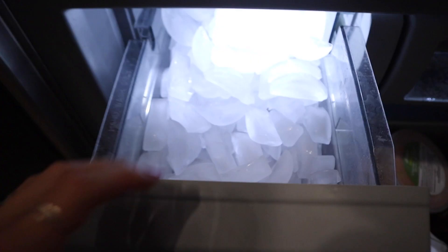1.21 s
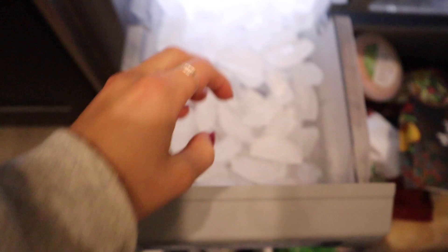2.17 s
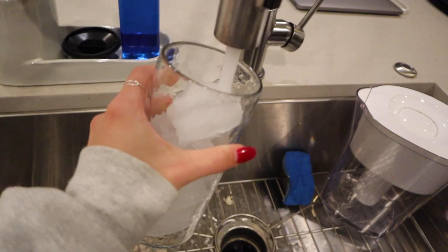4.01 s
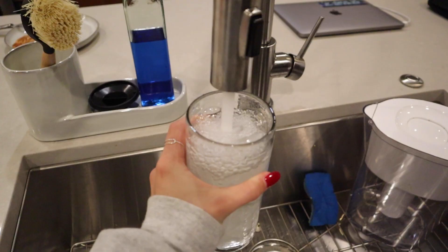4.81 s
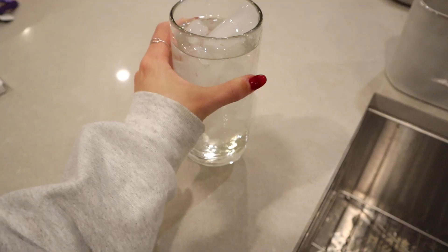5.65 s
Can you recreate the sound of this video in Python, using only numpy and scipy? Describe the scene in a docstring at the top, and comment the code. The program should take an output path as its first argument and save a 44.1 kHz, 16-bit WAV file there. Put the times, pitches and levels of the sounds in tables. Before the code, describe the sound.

In a small kitchen, heard close up, a freezer drawer peels off its seal and rumbles out, thudding as its plastic baskets clack. A hand digs through crunching ice in a plastic bin, and cubes drop into a glass with bright clinks. A tap then fizzes into the glass, filling it until it spills over. A sharp knock and splash sound in the steel sink, the tap stops, and the last water trickles away.

```python
"""Ice water in a small kitchen

Close up, on one microphone. A freezer drawer peels off its seal and rumbles out on its runners, baskets
clacking. A hand digs in the plastic ice bin and drops cubes into a tumbler, which rings at each strike.
An aerated tap fizzes into the glass, whose wall tones sink as the water rises, until it spills over.
Then a knock and a splash in the steel sink; the tap stops and the last water trickles away."""
import sys
import numpy as np
from scipy import signal
from scipy.fft import rfft, irfft, next_fast_len
from scipy.io import wavfile
from scipy.ndimage import uniform_filter1d

SR = 44100
rng = np.random.default_rng(int(sys.argv[2]) if len(sys.argv) > 2 else 0)


def dump_mix(stems):
    """Bounce the given channels to the path in sys.argv[1] as a 16-bit WAV at rate SR."""
    frames = np.atleast_2d(stems).T  # one column per channel
    limited = np.clip(frames, -1, 1)  # hard clip at full scale
    pcm = np.round(limited * 32767).astype(np.int16)
    wavfile.write(sys.argv[1], SR, pcm)


N = 303849
TIME = np.arange(N) / SR
TAP_ON_S, FULL_S, TAP_OFF_S = 4.068, 4.72, 6.23

# The drawer's rumble. Each row: frequency in Hz, relative level in dB.
RUMBLE = [(25, -5.5), (42, -4), (72, 4.5), (150, -11), (215, -3.5), (270, -14), (570, -100)]
# A knock at the sink and its bounce. Each row: start in seconds, level in dB.
SINK_KNOCKS = [(5.9692, -1.5), (5.988, -12)]


def from_db(db):
    """Decibels to gain."""
    return 10 ** (np.asarray(db) / 20)


def rms_one(x):
    """Scale to unit rms."""
    return x / np.sqrt(np.mean(x ** 2) + 1e-20)


def at_hz(points, hz):
    """Read a spectrum's dB on a log-frequency axis."""
    f, db = np.transpose(points)
    return np.interp(np.log(hz), np.log(f), db)


def tilted(hz, pivot_hz, db_per_octave):
    """A harder contact tips the spectrum towards the treble; dB."""
    return db_per_octave * np.log2(np.asarray(hz) / pivot_hz)


def add(out, s, sound):
    """Mix a sound in at s seconds."""
    i = int(s * SR)
    out[i:i + len(sound)] += sound[:N - i]


def between(start, end, fade=0.00052):
    """One while a source sounds, with short ramps."""
    return np.clip(np.minimum(TIME - start, end - TIME) / fade, 0, 1)


def swells(rows):
    """Gain of overlapping gestures: each gains 20 dB per rise time, holds, loses 20 dB per fall time."""
    power = 0
    for s, rise, hold, fall, level_db in rows:
        away = np.maximum(s - TIME, 0) / rise + np.maximum(TIME - s - hold, 0) / fall
        power = power + from_db(level_db - 20 * np.minimum(away, 10)) ** 2
    return np.sqrt(power)


def drift(per_s):
    """A random wander between knots of spread one."""
    knots = rng.standard_normal(N // 100)
    return np.interp(TIME * per_s, np.arange(len(knots)), knots)


def grains(per_s, spread_db):
    """Random clicks of uneven size; rms one."""
    sizes = from_db(spread_db * np.minimum(rng.exponential(1, N), 4)) * rng.choice([-1, 1], N)
    return rms_one(sizes * (rng.random(N) < per_s / SR))


def band(x, low_hz, high_hz):
    """Butterworth band-pass."""
    return signal.sosfilt(signal.butter(2, [low_hz, high_hz], "band", fs=SR, output="sos"), x)


def colour(drive, spectrum):
    """A minimum-phase filter with the given spectrum, falling 7 dB an octave outside it; rms one."""
    size = next_fast_len(N + 8192, True)
    hz = np.maximum(np.fft.rfftfreq(size, 1 / SR), 1)
    octaves_outside = np.abs(np.log2(hz / np.clip(hz, spectrum[0][0], spectrum[-1][0])))
    cepstrum = irfft(np.log(from_db(at_hz(spectrum, hz) - 7 * octaves_outside)), size)
    cepstrum[size // 2:] = 0
    return rms_one(irfft(rfft(drive, size) * np.exp(2 * rfft(cepstrum)), size)[:N])


def noise(spectrum):
    """Smooth coloured noise."""
    return colour(rng.standard_normal(N), spectrum)


def ring(drive, hz, t60):
    """One mode: a unit click starts a dying sine of height one."""
    r, w = from_db(-60 / (t60 * SR)), 2 * np.pi * hz / SR
    return signal.lfilter([0, np.sin(w)], [1, -2 * r * np.cos(w), r * r], drive + 1e-18)


def resonances(drive, rows):
    """A body's steady resonances, each at its own rms level."""
    return sum(from_db(level_db) * rms_one(ring(drive, hz, np.log(1000) / (np.pi * width_hz)))
               for hz, width_hz, level_db in rows)


def sing(drive, hz, width_hz):
    """A resonance whose centre moves; rms one."""
    turn = np.exp(2j * np.pi * np.cumsum(hz) / SR)
    pole = np.exp(-np.pi * width_hz / SR)
    return rms_one((signal.lfilter([1], [1, -pole], drive / turn) * turn).real)


def blow(edges_hz, levels_db, t60, bass_hold, snap, build=0):
    """A click and a dense clatter, one level (over 20 ms) per band; bass_hold lets the lows last longer."""
    t, out = TIME[:SR // 3], 0
    for k, (low, high, level_db) in enumerate(zip(edges_hz, edges_hz[1:], levels_db)):
        life = t60 * (1000 / np.sqrt(low * high)) ** bass_hold
        envelope = from_db(-60 * np.minimum(t / life, 3))
        envelope *= np.minimum((t + 1 / SR) / max(build * life, 1 / SR), 1)
        drive = rng.standard_normal(len(t)) * envelope / np.linalg.norm(envelope)
        drive[0] += snap * (-1) ** k
        zone = band(drive, low, high)
        out = out + zone / np.linalg.norm(zone) * from_db(level_db)
    return out * np.sqrt(.02 * SR)


def kitchen(x, t60, treble_hz):
    """The room's answer at the microphone: a diffuse tail that loses its treble first."""
    t, edges = TIME[:SR // 2], np.geomspace(60, 18000, 9)
    tail = sum(band(rng.standard_normal(len(t)), low, high)
               * from_db(-60 * t / t60 * (1 + low / treble_hz)) for low, high in zip(edges, edges[1:]))
    tail *= np.clip(t / .008, 0, 1) / np.sqrt(SR * t60 / np.log(1e6))
    return signal.fftconvolve(x, tail)[:N]


def room_tone():
    """The kitchen's quiet rumble."""
    # Each row: frequency in Hz, relative level in dB.
    spectrum = [(25, -2.5), (35, -27), (88, -21), (383, -23.5), (749, -35.5), (15000, -50.5)]
    return from_db(-52) * noise(spectrum)


def freezer():
    """The fan blows; the motor hums until the drawer opens."""
    # The fan's air. Each row: frequency in Hz, relative level in dB.
    fan = [(60, 12), (130, 0), (900, -2.5), (3000, -20.5), (9000, -24.5)]
    hum = from_db(-41.5) * np.sqrt(2) * np.sin(2 * np.pi * 490 * TIME)
    return hum * between(-1, 0.14, fade=0.017) + from_db(-45) * noise(fan)


def hollow(x):
    """What shakes the drawer is heard both directly and through its hollow plastic basket."""
    # The basket's resonances. Each row: frequency in Hz, gain in dB.
    modes = [(396, 4), (616, 0), (953, 1.5), (1270, -4), (2030, 1.5), (2480, -6)]
    peaks = sum(from_db(mode_db) * signal.lfilter(*signal.iirpeak(hz, Q=17.3, fs=SR), x + 1e-18)
                for hz, mode_db in modes)
    return from_db(-2) * x + peaks


def drawer():
    """The drawer's speed drives rumble, rollers and rubbing; seal and baskets drag, the runners scrape."""
    # Gestures. Each row: peak time, rise, hold and fall in seconds, level in dB.
    pulls = [(0.78, 0.45, 0.16, 0.65, -28), (1.87, 0.18, 0.22, 0.48, -29.5)]  # the drawer gathers speed, runs and coasts
    rubs = [(0.18, 0.55, 0.14, 0.91, -36.5), (0.52, 0.29, 0.092, 0.52, -34),
            (2.08, 0.077, 0.024, 0.47, -37)]  # seal and baskets drag
    scrapes = [(0.15, 0.021, 0.01, 0.19, -33)]  # the runners stick and slip
    # Spectra of rolling and rubbing. Each row: frequency in Hz, relative level in dB.
    roller_spectrum = [(88, -10), (150, -17.5), (193, 4), (284, 4.5), (618, 2.5), (3000, -24), (6600, -120)]
    rub_spectrum = [(710, -18.5), (1200, 0.5), (3700, 1), (4800, -7), (9610, -11), (16000, -31.5)]
    # The runners' resonances. Each row: frequency and width in Hz, relative level in dB.
    runners = [(2200, 160, 3), (2840, 360, 0.5), (3720, 370, -6), (8400, 400, -10.5)]
    speed = swells(pulls)
    rumble = from_db(-8) * speed * noise(RUMBLE)
    rollers = speed * rms_one(hollow(colour(grains(2500, 0.93), roller_spectrum)))
    rubbing = colour(grains(2500, 2.3) * from_db(2.4 * drift(60)), rub_spectrum)
    scraping = swells(scrapes) * resonances(grains(900, 0.92), runners)
    pressure = np.hypot(swells(rubs), from_db(-20.5) * speed)
    return rumble + rollers + pressure * rubbing + scraping


def drawer_knocks(shudder_t60=0.41):
    """Plastic baskets clack; each thud sets the steel frame ringing and shuddering, deeper when soft."""
    # Each row: start in seconds, thud and clack in dB, brightness in dB per octave, t60 in seconds.
    knocks = [(0.249, -40, -38, 5, 0.13), (0.409, -37.5, -44.5, -7, 0.089), (0.4847, -24, -18, -3.5, 0.018),
              (0.574, -36, -35.5, -2.5, 0.022), (0.708, -38, -19.5, -3.5, 0.11),
              (0.936, -23, -32.5, 2, 0.18), (0.96, -8, -29.5, -9, 0.036), (1.309, -30, -26.5, -2.5, 0.19),
              (1.455, -23.5, -31, -3.5, 0.082), (1.683, -35, -53.5, -4, 0.046),
              (1.924, -42, -27.5, 1, 0.024), (1.965, -35, -32, 0, 0.19), (2.008, -27, -17.5, -3, 0.046),
              (2.017, -29.5, -21, -0.5, 0.056)]
    # The frame's modes. Each row: frequency in Hz, relative level in dB, t60 in seconds.
    frame = [(81, -6.5, 0.23), (105, -4.5, 0.14), (207, -11.5, 0.3), (303.4, -6.5, 0.21)]
    clacks = np.zeros(N)
    for s, thud_db, clack_db, brightness, t60 in knocks:
        zones_db = clack_db + tilted([520, 1800, 6300], 1800, brightness)
        zones_db[0] = max(zones_db[0], thud_db - 16.5)  # the thud's hollow middle
        add(clacks, s, blow([80, 270, 1000, 3200, 12500], [thud_db, *zones_db], t60,
                            bass_hold=0.09, snap=0.34, build=0.032))
    out = hollow(clacks)
    times, thuds_db = np.transpose(knocks)[:2]
    at, thumps = (times * SR).astype(int), np.zeros(N)
    thumps[at] = from_db(thuds_db)
    hardness = 0.5 * (thuds_db + 17.5)  # dB per octave
    for hz, mode_db, t60 in frame:
        push = thumps.copy()
        push[at] *= from_db(mode_db + tilted(hz, 160, hardness))
        out += ring(push, hz, t60)
    power_decay = from_db(-120 / (shudder_t60 * SR))
    shudder = np.sqrt(signal.lfilter([1], [1, -power_decay], thumps ** 2 + 1e-18))
    out += from_db(-2.5) * shudder * noise(RUMBLE)
    return out + from_db(-14) * kitchen(out, t60=0.5, treble_hz=6170)


def seal_squeaks():
    """The rubber seal sticks and slips as it peels off; its wavering pitch rises with the pressure."""
    # Each row: peak time, rise, hold and fall in seconds, level in dB, pitch at the peak in Hz.
    squeaks = [(0.325, 0.11, 0.043, 0.071, -36.5, 3690), (0.623, 0.015, 0.032, 0.05, -36.5, 2270)]
    out = 0
    for *gesture, hz in squeaks:
        pressure = swells([gesture])
        bend = 0.11 * (pressure / pressure.max() - 1) + 0.014 * drift(14)
        out = out + pressure * sing(grains(1480, 1.76), hz * (1 + bend), width_hz=190)
    return out


def puff(start_s=0.939, hz=48.7):
    """The drawer front meets its stop and pushes one slow swing of air at the microphone."""
    return -from_db(-13) * np.sin(2 * np.pi * hz * (TIME - start_s)) * between(start_s, start_s + 1 / hz)


def cube_rings(times, levels_db, low_hz, high_hz, t60):
    """No two cubes are alike: each strike rings six short tones at chance pitches."""
    out, t = np.zeros(N), TIME[:SR // 10]
    for s, level_db, places in zip(times, levels_db, rng.random((len(times), 6))):
        pitches = low_hz * (high_hz / low_hz) ** places
        tones = (-1) ** np.arange(6) @ np.sin(2 * np.pi * np.outer(pitches, t))
        add(out, s, from_db(level_db - 60 * t / t60) * tones)
    return out


def ice_bin():
    """Cubes tumble in a hollow plastic bin: a dense crunch, and clacks that crack more when harder."""
    # Cubes knocking together. Each row: start in seconds, level in dB.
    hits = [(2.524, -17.5), (2.655, -21.5), (2.679, -18), (2.7329, -16.5), (2.755, -20), (2.827, -19),
            (2.881, -22.5), (3.012, -27.5), (3.055, -19.5), (3.068, -27.5), (3.095, -25), (3.108, -26),
            (3.135, -29), (3.142, -16), (3.188, -26), (3.204, -24)]
    # The hand's scoops. Each row: peak time, rise, hold and fall in seconds, level in dB.
    scoops = [(2.51, 0.0067, 0.3, 0.24, -19), (2.65, 0.12, 0.04, 0.052, -17.5),
              (3.09, 0.24, 0.14, 0.11, -32)]
    # The shifting heap and its small bright cracks. Each row: frequency in Hz, relative level in dB.
    heap_spectrum = [(150, -15), (348, 9.5), (520, 2.5), (660, 8), (2060, 6.5), (3350, -4.5),
                     (16000, -34.5)]
    crack_spectrum = [(1500, -7), (3000, -6), (9000, -7), (16000, -29)]
    out = np.zeros(N)
    for s, level_db in hits:
        crack_db = -33.5 + 1.76 * (level_db + 19.5)
        add(out, s, blow([320, 1000, 2700, 8000], [level_db - 5.5, level_db - 3, crack_db],
                         t60=0.029, bass_hold=0.26, snap=0.32, build=0.05))
    times, levels_db = np.transpose(hits)
    out += cube_rings(times, levels_db + 5.5, low_hz=920, high_hz=2706, t60=0.022)
    slips = from_db(3 * drift(70))  # the heap gives way in small slides
    crunch = colour(grains(3200, 2.7) * slips, heap_spectrum)
    crunch += from_db(-24) * colour(grains(370, 8.1) * slips, crack_spectrum)
    out += swells(scoops) * crunch * between(2.508, 7)
    return out + from_db(-16) * kitchen(out, t60=0.18, treble_hz=6000)


def tumbler(settle_s=0.051):
    """Each cube cracks against the glass, rings every mode with a chance strength, jostles and settles."""
    # Strikes. Each row: start in seconds, level in dB, brightness in dB per octave.
    clinks = [(3.2848, -37.5, -2), (3.3068, -31, -8), (3.3199, -25.5, 6), (3.36, -33.5, -4),
              (3.371, -34.5, 0), (3.384, -38.5, 3.5), (3.3987, -30, 0), (3.447, -48.5, 7.5),
              (3.457, -42, -6), (3.584, -57, -15), (3.6476, -25.5, 0.5), (3.668, -30, -3),
              (3.678, -28.5, 0.5), (3.811, -33.5, -4.5), (3.827, -30.5, -1.5), (3.841, -34.5, -2),
              (3.858, -38.5, 1), (3.868, -28.5, 0)]
    # The tumbler's modes. Each row: frequency in Hz, relative level in dB, t60 in seconds.
    modes = [(500.6, -11.5, 0.3), (1111, 5, 0.074), (1683, -7, 0.2), (1984, 7.5, 0.022), (3240, 0, 0.032),
             (3770, 2.5, 0.036), (4250, 5.5, 0.027), (4707, 11, 0.023), (4705, -16.5, 0.59),
             (5200, 0.5, 0.027), (5670, 6, 0.046), (6030, 7, 0.029), (8300, 2, 0.037), (8890, 4.5, 0.065),
             (9870, -1.5, 0.055), (11300, -5.5, 0.029), (13950, -1, 0.019)]
    # The force of ice on glass. Each row: frequency in Hz, relative level in dB.
    contact = [(1300, 1.2), (4500, 5), (9500, 3)]
    times, levels_db, brightness = np.transpose(clinks)
    at = (times * SR).astype(int)

    def force_db(hz):
        """Strength of every strike at one frequency."""
        hz = np.clip(hz, contact[0][0], contact[-1][0])
        return levels_db + at_hz(contact, hz) + tilted(hz, 3330, brightness)

    chance_db = rng.normal(0, 4.9, (len(times), len(modes)))
    signs = rng.choice([-1, 1], chance_db.shape)
    rebounds = (rng.random(N) < 170 / SR) * from_db(-29.5)
    power_decay = np.exp(-1 / (settle_s * SR))
    out = np.zeros(N)
    for k, (hz, mode_db, t60) in enumerate(modes):
        clicks = np.zeros(N)
        clicks[at] = signs[:, k] * from_db(chance_db[:, k] + force_db(hz))
        unrest = np.sqrt(signal.lfilter([1], [1, -power_decay], clicks ** 2 + 1e-18))
        out += from_db(mode_db) * ring(clicks + unrest * rebounds * rng.standard_normal(N), hz, t60)
    cracks_db = [force_db(200) - 17, force_db(1600) - 1, force_db(2700) - 0.5, force_db(9500) - 16]
    for s, zones_db in zip(times, np.transpose(cracks_db)):
        add(out, s, blow([80, 450, 2900, 6000, 10500], zones_db,
                         t60=0.14, bass_hold=0.61, snap=0.11, build=0.02))
    out += cube_rings(times, force_db(4500) - 2.5, low_hz=2095, high_hz=10460, t60=0.02)
    return out + from_db(-14) * kitchen(out, t60=0.6, treble_hz=3000)


def churned_air(cycles=25):
    """Large bubbles of ten sizes ring low in the glass; rms one."""
    return rms_one(sum(rms_one(ring(grains(50, 7.6), hz, cycles / hz))
                       for hz in np.geomspace(150, 260, 10)))


def wall_tones(depth):
    """Rising water loads the glass wall and lowers its tones."""
    # Each row: pitch when empty, pitch when full and width in Hz, relative level in dB.
    modes = [(466, 345, 18, -3.5), (1150, 760, 32, -4), (1650, 1210, 98, -6), (2770, 2430, 72, -1.5),
             (5700, 4720, 110, -20)]
    return sum(from_db(mode_db) * sing(grains(1500, 3.2), empty + (full - empty) * depth, width_hz)
               for empty, full, width_hz, mode_db in modes)


def plinks(count=800, low_hz=860, high_hz=7100, cycles=18):
    """Small bubbles pinch off and rise in pitch as they near the surface; rms one while the tap runs."""
    out, t = np.zeros(N), TIME[:SR // 20]
    running_s = TAP_OFF_S - TAP_ON_S
    for when, place, size in rng.random((count, 3)):
        hz = low_hz * (high_hz / low_hz) ** place
        age = np.minimum(t * hz / cycles, 2)
        level_db = -6 * np.log(max(size, .03)) - 60 * age
        chirp = np.sin(2 * np.pi * hz * t * (1 + 0.08 * age))
        add(out, TAP_ON_S + when * running_s, from_db(level_db) * chirp)
    return rms_one(out) * np.sqrt(running_s / TIME[-1])


def tap(blend_s=0.003):
    """The aerated jet fizzes, splashes and churns air; the overflow spatters and drums on the basin."""
    # The jet fills the glass, churns at the brim, spills over, then runs past it.
    # Each row: start in seconds, then spray, splash, wall and basin levels in dB.
    stages = [(4.068, -25.5, -43.5, -41, -48), (4.861, -25, -45.5, -51, -49.5),
              (5.709, -24.5, -46, -45.5, -43), (5.975, -28, -39.5, -48, -33.5)]
    # Spectra of the water. Each row: frequency in Hz, relative level in dB.
    fizz_filling = [(820, -5), (1400, 0.5), (2000, -3.5), (3000, 4), (4080, -3.5), (5500, 1), (7200, -1.5),
                    (9000, 3), (16000, -5.5)]
    fizz_full = [(820, -44.5), (1400, -4.5), (2740, 1), (4380, -6.5), (5890, 4.5), (7010, -3), (9700, 1),
                 (11500, -2), (16000, 0)]
    fizz_spilling = [(820, -30.5), (2000, -11), (3250, 2), (4100, -4), (7600, 0), (13500, -4.5),
                     (16000, -12)]
    splash_spectrum = [(180, -40), (300, -1.5), (750, 0), (1600, 1), (3000, -20), (6600, -120)]
    drum_spectrum = [(60, -21.5), (115, 1.5), (180, -10.5), (700, -14)]
    # Overflow on the steel. Each row: frequency and width in Hz, level in dB against the spray.
    spatter_modes = [(6070, 330, -9)]
    starts, *levels_db = np.transpose(stages)
    stage = np.maximum(np.searchsorted(starts, TIME) - 1, 0)
    shares = np.abs([uniform_filter1d((stage == k) * 1., int(blend_s * SR)) for k in range(len(stages))])
    spray_db, splash_db, wall_db, basin_db = np.array(levels_db) @ shares
    filling, full, spilling = shares[0], shares[1], shares[2] + shares[3]
    depth = np.clip((TIME - TAP_ON_S) / (FULL_S - TAP_ON_S), 0, 1)
    fizzes = [(filling, fizz_filling), (full, fizz_full), (spilling, fizz_spilling)]
    fizz = sum(np.sqrt(share) * colour(grains(14000, 3), spectrum) for share, spectrum in fizzes)
    spatter = spilling * resonances(grains(2700, 2.5), spatter_modes)
    flutter_db = 1.6 * spilling * drift(160)  # the spilling sheet breaks up unevenly
    spray = from_db(spray_db + flutter_db) * (fizz + spatter)
    slosh = swells([(SINK_KNOCKS[0][0], .002, 0, 0.19, -11.5)])  # water thrown by the knock at the sink
    splash = np.hypot(from_db(splash_db), slosh) * colour(grains(2200, 0.97), splash_spectrum)
    churn = filling * from_db(-36 - 19.5 * depth ** 2) * churned_air()
    wall = from_db(wall_db) * wall_tones(depth)
    drumming = from_db(basin_db) * colour(grains(900, 2), drum_spectrum)
    bursts = cracks_and_spit()
    bubbling = from_db(wall_db) * plinks() + glugs()
    return (spray + splash + churn + wall + drumming + bursts + bubbling) * between(TAP_ON_S, TAP_OFF_S)


def cracks_and_spit(width_ratio=1.28):
    """Two sharp ice cracks in the water, then a short spit as the overflow begins."""
    # Each row: start in seconds, levels of the lower bands and top band in dB, top band's centre in Hz.
    bursts = [(4.694, -30, -21, 11100), (4.831, -31, -26, 14300), (5.712, -43, -31, 5440)]
    out = np.zeros(N)
    for s, low_db, top_db, top_hz in bursts:
        edges_hz = [700, 1900, top_hz / width_ratio, top_hz * width_ratio]
        add(out, s, blow(edges_hz, [low_db, low_db, top_db], t60=0.015, bass_hold=0, snap=0.21))
    return out


def glugs(rise_s=0.0071):
    """Big bubbles burst near the brim, each a short soft-edged tone."""
    # Each row: start in seconds, pitch in Hz, level in dB.
    bursts = [(4.737, 704, -32), (4.774, 212, -36)]
    out, t = np.zeros(N), TIME[:SR // 5]
    envelope = t / rise_s * np.exp(1 - t / rise_s)
    for s, hz, level_db in bursts:
        add(out, s, from_db(level_db) * envelope * np.sin(2 * np.pi * hz * t))
    return out


def sink(basin_t60=0.67):
    """Something hard knocks and bounces; once the tap shuts, the basin rings on and the water drains."""
    # The knock's balance: bass, low middle, high middle and treble in dB.
    zones_db = [-11, -9, 5, -16]
    # The last trickles. Each row: peak time, rise, hold and fall in seconds, level in dB.
    trickles = [(6.38, 0.12, 0.033, 0.3, -44.5), (6.64, 0.18, 0.45, 0.3, -49.5)]
    # The drain's spectrum. Each row: frequency in Hz, relative level in dB.
    drain_spectrum = [(53, -48), (100, -4), (1470, -16), (16000, -35)]
    # The steel basin's tones. Each row: frequency and width in Hz, relative level in dB.
    basin_modes = [(1430, 360, -57), (2400, 330, -61), (3770, 44, -61.5), (5780, 32, -74)]
    knock = np.zeros(N)
    for s, level_db in SINK_KNOCKS:
        add(knock, s, blow([45, 110, 600, 1900, 12500], level_db + np.array(zones_db),
                           t60=0.021, bass_hold=0.2, snap=0.15))
    drain = swells(trickles) * colour(grains(4000, 0.85), drain_spectrum)
    dying = from_db(18 - 60 * np.maximum(TIME - TAP_OFF_S, 0) / basin_t60)
    basin = dying * resonances(rng.standard_normal(N), basin_modes)
    room = from_db(-6) * kitchen(knock, t60=0.2, treble_hz=5960)
    return knock + room + (drain + basin) * between(TAP_OFF_S, 7)


def scene():
    """Freezer, ice and tap over the room tone; the one microphone feeds both channels."""
    mono = drawer_knocks() + puff()
    mono += (drawer() + seal_squeaks() + freezer()) * between(0, 2.271)
    mono += ice_bin() + tumbler() + tap() + sink() + room_tone()
    return np.stack([mono, mono])


def record(dry, limit_db=-5, release_db_per_s=186, cutoff_hz=15700):
    """The recorder's limiter ducks after the loudest knocks; peaks are flattened and the top is cut."""
    level_db = 10 * np.log10(np.abs(uniform_filter1d(dry[0] ** 2, size=96)) + 1e-12)
    recovery = release_db_per_s * TIME
    duck_db = np.maximum.accumulate(np.maximum(level_db - limit_db, 0) + recovery) - recovery
    limited = dry * from_db(-uniform_filter1d(duck_db, size=48))
    flattened = limited / (1 + (limited / .8) ** 6) ** (1 / 6)
    return signal.sosfilt(signal.ellip(10, .2, 80, cutoff_hz, fs=SR, output="sos"), flattened)


dry = scene()
out = record(dry)
dump_mix(out)
```